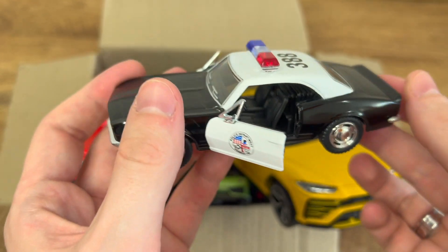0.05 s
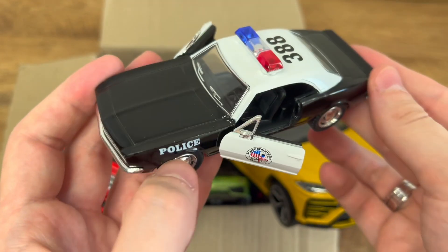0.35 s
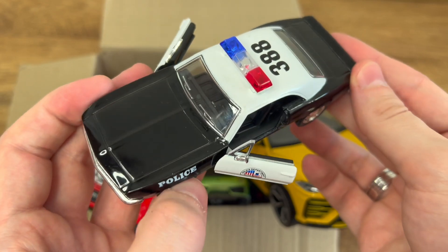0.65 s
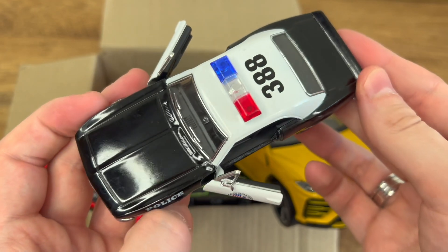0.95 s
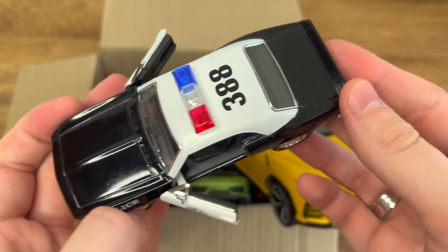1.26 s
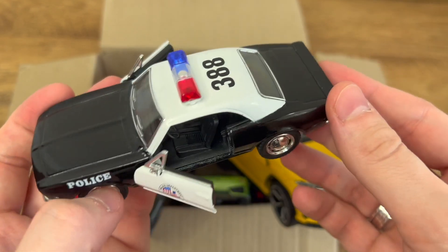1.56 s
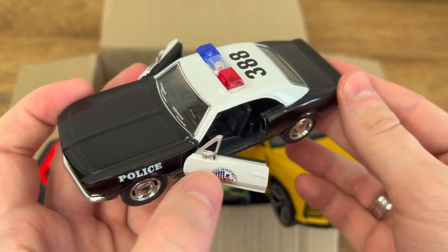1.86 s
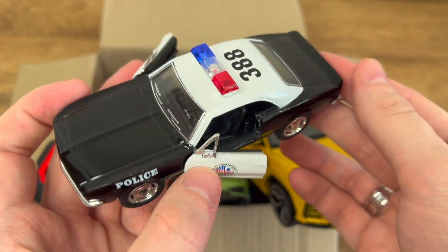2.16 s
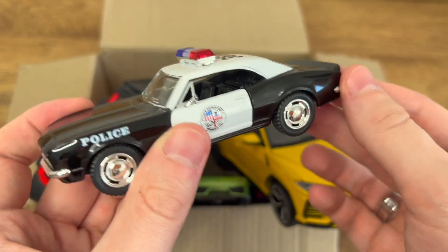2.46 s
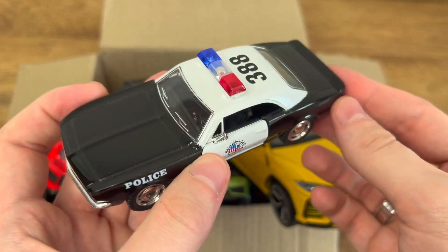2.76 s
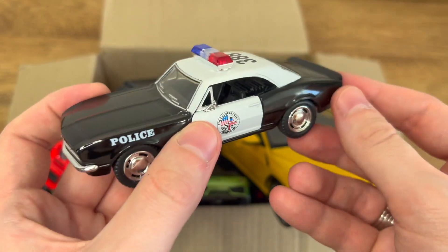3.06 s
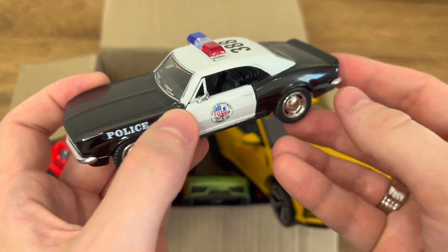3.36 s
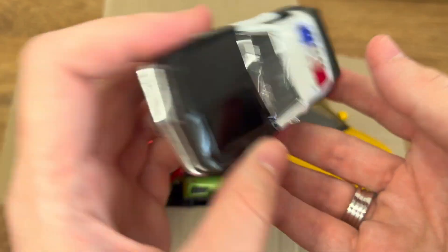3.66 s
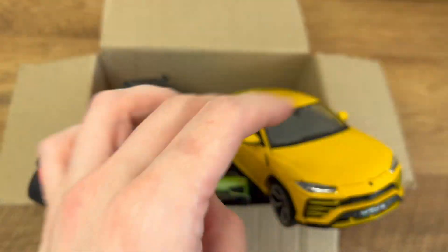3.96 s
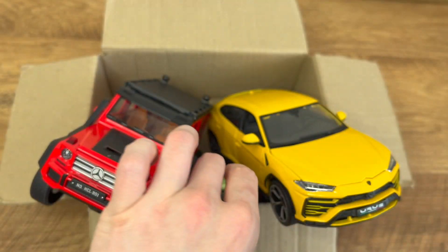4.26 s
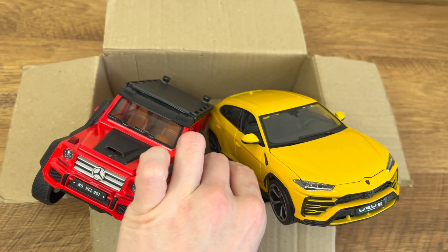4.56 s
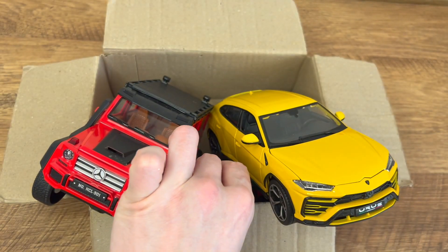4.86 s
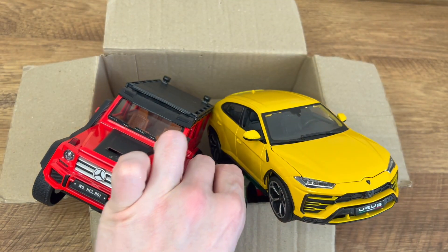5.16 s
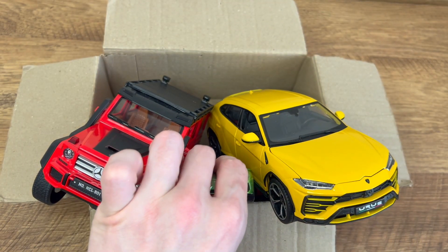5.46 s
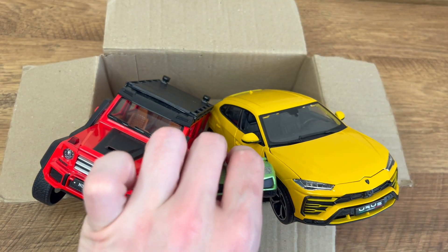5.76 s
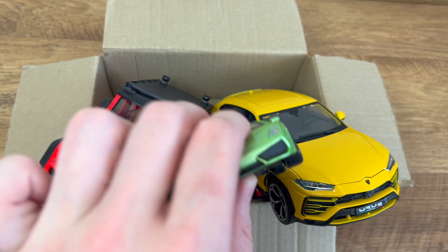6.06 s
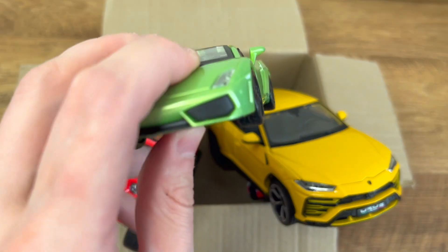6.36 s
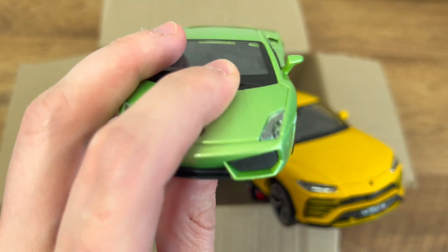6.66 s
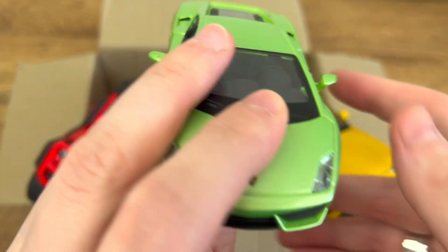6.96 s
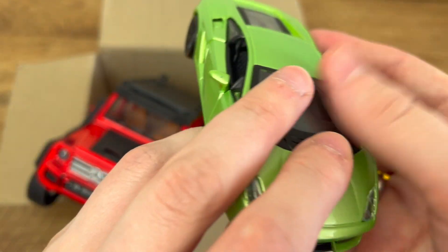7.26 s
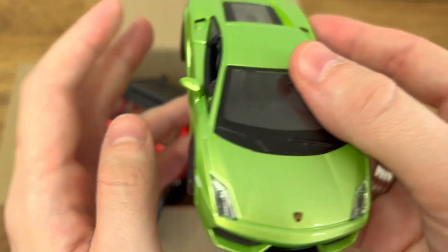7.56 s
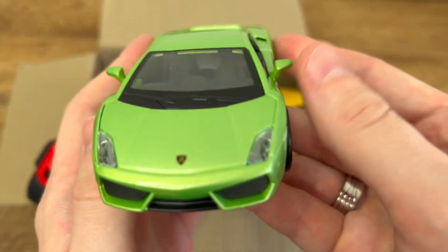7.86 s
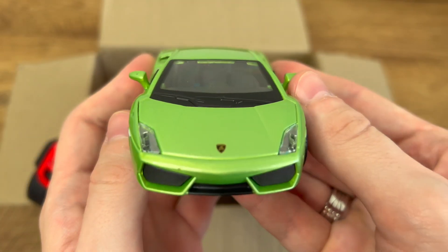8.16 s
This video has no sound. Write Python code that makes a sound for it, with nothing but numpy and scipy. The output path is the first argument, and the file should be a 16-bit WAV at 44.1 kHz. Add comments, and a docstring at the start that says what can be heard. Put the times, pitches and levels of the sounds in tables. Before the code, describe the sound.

Toy cars click and rattle in the hands, then one is dragged from a rasping cardboard box, knocking against the others.

```python
"""Die-cast toy cars are handled over a cardboard box, close to a stereo microphone in a small room.
First a police car ticks in the fingers as loose wheels and doors strike its ringing shell. Its door
snaps shut at 2.2 s; near 3.8 s its gears run up and it rattles as it is put aside. From 4.4 s a sports
car is dragged out, bumping its neighbours, while stick-slip friction makes the cardboard rasp, groan
and crackle. From 6.2 s the sports car clacks as it is turned over and its axles shift in their slots."""
import sys
import numpy as np
from scipy import signal
from scipy.fft import rfft, irfft
from scipy.io import wavfile
from scipy.ndimage import map_coordinates

SR = 44100
rng = np.random.default_rng(int(sys.argv[2]) if len(sys.argv) > 2 else 0)


def store_wav(level_fs):
    """Save 16-bit WAV to argv[1]."""
    pcm = np.round(np.clip(np.atleast_2d(level_fs), -1, 1) * 32767)
    wavfile.write(sys.argv[1], SR, pcm.T.astype(np.int16))


N = 366471
TIME = np.arange(N) / SR


def impacts(contacts, modes, width_hz, dense_modes, ring_db, crack_t60, treble_t60, rise_s,
            chatter_t60, spread, gain_db, focus_db=10.5, focus_octaves=0.34, softening=0.29):
    """Modal superposition: each blow excites damped modes over a crack of dense, short-lived ones."""
    track, t = np.zeros((2, N)), TIME[:5120]
    mode_hz, mode_db = np.transpose(modes)
    for start_s, level_db, treble_db, focus_hz in contacts:
        # the grip detunes the modes, the contact point weights them, soft blows favour the low ones
        detuned_hz = mode_hz * (1 + 0.013 * rng.standard_normal(len(modes)))
        boost_db = focus_db * np.exp(-(np.log2(mode_hz / focus_hz) / focus_octaves) ** 2)
        tilt_db = softening * (treble_db + 4) * np.log2(mode_hz / mode_hz[0])
        amplitudes = undb(mode_db + tilt_db + boost_db + 2.2 * rng.standard_normal(len(modes)))
        phases = 2 * np.pi * rng.random(len(modes)) + spread * rng.standard_normal((2, len(modes)))
        oscillations = np.exp(np.pi * (2j * detuned_hz - width_hz)[:, None] * t)
        ring = unit(((amplitudes * np.exp(1j * phases)) @ oscillations).imag)
        crack = colour(stereo_noise(len(t), spread) * fade(t, crack_t60), dense_modes)
        crack = unit(butter(crack, 4300, "low"))
        tick = colour(stereo_noise(len(t), spread / 2) * fade(t, treble_t60), dense_modes)
        tick = unit(butter(tick, 4280, "high"))
        # hard contacts crack; soft ones push for longer, so the shell rings up more slowly
        hardness = undb(softening * treble_db)
        rise = 1 - np.exp(-t * hardness / rise_s)
        body = unit(hardness * crack + undb(ring_db) * ring)
        blow = (body + undb(treble_db) * tick) * rise * undb(gain_db + level_db)
        add(track, start_s, signal.fftconvolve(blow, rebounds(chatter_t60)))
    return track


def rebounds(t60, level_db=-9, per_s=2000, size=2048):
    """Contact chatter: one impulse and its dying rebounds, scaled to unit energy."""
    taps = rng.standard_normal(size) * (rng.random(size) < per_s / SR)
    taps *= undb(level_db) * fade(TIME[:size], t60)
    taps[0] = 1
    return taps[None] / np.linalg.norm(taps)


def wheel_jiggles(spans, per_s=55, scatter_db=3, treble_db=-31, focus_hz=2200):
    """Mechanical play: loose wheels make soft contacts at random moments."""
    return [(start_s + length_s * rng.random(), level_db + scatter_db * rng.standard_normal(),
             treble_db, focus_hz)
            for start_s, length_s, level_db in spans for _ in range(int(per_s * length_s))]


def gear_teeth(start_s=3.755, run_s=0.097, teeth_hz=165, end_db=-19, swell_db_per_s=79.5,
               treble_db=-15, focus_hz=1600):
    """Gear meshing: as the wheels are brushed, teeth strike unevenly, ever harder, then stop dead."""
    times = np.arange(0, run_s, 1 / teeth_hz)
    scatter = rng.standard_normal((len(times), 2))
    return [(start_s + t + 0.29 * lag / teeth_hz, end_db - swell_db_per_s * (run_s - t) + scatter_db,
             treble_db, focus_hz) for t, (lag, scatter_db) in zip(times, scatter)]


# Levels in all tables are relative; focus_hz is the region of modes that a contact favours.
# loose wheels and doors strike the shell: start_s, level_db, treble_db, focus_hz
POLICE_CONTACTS = [(0.167, -33.5, -21, 2310), (0.1915, -19, -12.5, 2330), (0.2017, -24.5, -17, 2170),
                   (0.2887, -23, -5, 2560), (0.3095, -26.5, -27.5, 2710), (0.5029, -31, -24, 2360),
                   (0.7089, -39, -19.5, 2920), (1.4141, -27, -14.5, 2860), (1.5539, -18.5, -7, 2540),
                   (1.6573, -24.5, -9, 2460), (1.7195, -31.5, -25.5, 2550), (2.185, -25.5, -10, 1980),
                   (2.1935, -24.5, -1, 2350), (2.4081, -32, -11.5, 2320), (2.5999, -28.5, -23, 2390),
                   (2.6117, -17.5, -6.5, 2030), (2.8255, -43.5, -16, 1676), (2.9307, -35.5, -19, 2360),
                   (2.9939, -25.5, -6.5, 3430), (3.018, -29, -7, 2470), (3.119, -45.5, -21, 1900),
                   (3.2881, -30, -11, 2383), (3.312, -20.5, -12.5, 2040), (3.4575, -38, -16.5, 2020),
                   (3.5962, -27, -17.5, 2710), (3.6725, -33.5, -18, 2420), (3.6853, -29, -16.5, 1650),
                   (3.7468, -16, -5.5, 1940), (3.7699, -36, -14.5, 1980), (3.7993, -26.5, -13.5, 1880),
                   (3.8187, -18, -6.5, 1870), (3.8552, -15, -16, 1655), (3.8876, -39.5, -52, 2210),
                   (3.9409, -48, -45, 1540), (4.1711, -45, -35, 1546)]
# the wheels jiggle as the grip shifts: start_s, length_s, level_db
POLICE_JIGGLES = [(1.965, .04, -49.5), (3.434, 0.05, -44), (3.648, 0.077, -38)]
# resonances of the shell: frequency_hz, level_db
POLICE_MODES = [(580, -15.5), (1160, -4), (1540, -2), (1696, 1.5), (1870, 0.5), (2034, -4.5), (2317, 2),
                (2574, -3), (2940, 2), (3882, -10), (4570, -10.5), (5196, -15)]
# spectrum of its dense, short-lived modes: frequency_hz, level_db
POLICE_DENSE_MODES = [(100, -34.5), (400, -31), (650, -19), (1200, -17.5), (1900, -4), (2900, -4),
                      (3600, -10.5), (6500, -10.5), (10000, -21.5), (14500, -19.5)]
# the car moves from the left to the middle: time_s, left_minus_right_db
POLICE_PAN = [(0, 3.5), (3.6, 4), (3.8, -0.5)]
POLICE_WIDTH_HZ = 115  # bandwidth of each mode, damped by the hand


def police_car():
    """Impact excitation: loose parts ring the metal shell; a level difference sets its direction."""
    contacts = POLICE_CONTACTS + gear_teeth() + wheel_jiggles(POLICE_JIGGLES)
    shell = impacts(contacts, POLICE_MODES, POLICE_WIDTH_HZ, POLICE_DENSE_MODES, ring_db=-2,
                    crack_t60=0.062, treble_t60=0.045, rise_s=0.00046, chatter_t60=0.017,
                    spread=0.76, gain_db=-17.5)
    return shell * undb(np.array([[0.5], [-0.5]]) * curve(POLICE_PAN))


# the door touches its catch, jumps it, then seats: start_s, level_db, treble_db, focus_hz
LATCH_CONTACTS = [(2.1737, -38.5, 9, 3630), (2.2103, -18.5, 10, 5000), (2.2137, -17, 8.5, 3100)]
# spectrum of the snap's dense modes: frequency_hz, level_db
LATCH_DENSE_MODES = [(400, -19), (3300, 3.5), (10000, -3), (14000, 1)]


def door_latch():
    """Stiff contact: the small latch excites only the upper modes of the police car's shell."""
    upper_modes = [(hz, db) for hz, db in POLICE_MODES if hz > 2750]
    return impacts(LATCH_CONTACTS, upper_modes, POLICE_WIDTH_HZ, LATCH_DENSE_MODES, ring_db=-5,
                   crack_t60=0.084, treble_t60=0.0099, rise_s=0.0012, chatter_t60=0.0045,
                   spread=0.61, gain_db=-14)


def door(squeak_s=0.0081, squeak_hz=6300, squeak_db=-16, jolt_hz=72, jolt_t60=0.053, jolt_db=-37):
    """Friction and recoil: the tight door squeaks into its frame, then the snap jolts the hands."""
    track, t = np.zeros((2, N)), TIME[:SR // 2]
    jump_s, seat_s = LATCH_CONTACTS[1][0], LATCH_CONTACTS[2][0]
    squeak = unit(signal.lfilter(*signal.iirpeak(squeak_hz, Q=5, fs=SR), stereo_noise(len(t), 0.21)))
    add(track, jump_s - squeak_s, undb(squeak_db) * squeak * (t / squeak_s) * (t < squeak_s))
    thud = unit(butter(stereo_noise(len(t), 0.42), 370, "low", order=2))
    jolt = np.sin(2 * np.pi * jolt_hz * t) + 0.5 * thud
    add(track, seat_s, undb(jolt_db) * jolt * fade(t, jolt_t60))
    return track


# the axles shift in their slots: start_s, level_db, treble_db, focus_hz
SPORTS_CONTACTS = [(6.1718, -26, -24, 2400), (6.4441, -34, -16.5, 2330), (7.0723, -22, -14, 1149),
                   (7.085, -24, -21, 1880), (7.1835, -17.5, -24.5, 1860), (7.2726, -40.5, -9, 1850),
                   (7.3529, -23, -21, 2300), (7.3666, -24.5, -17, 2342), (7.6416, -28, -4.5, 2004),
                   (7.6458, -13, -11, 2093)]
# the wheels jiggle against the fingers: start_s, length_s, level_db
SPORTS_JIGGLES = [(7.11, .025, -35.5), (7.372, 0.055, -35.5), (8.0, .04, -50.5)]
# resonances of the shell: frequency_hz, level_db
SPORTS_MODES = [(1020, -8.5), (1200, -5.5), (1600, -1), (1860, 4.5), (2080, 2.5), (2410, 6.5), (3100, -3)]
# spectrum of its dense, short-lived modes: frequency_hz, level_db
SPORTS_DENSE_MODES = [(200, -36.5), (450, -15.5), (750, -22), (1000, -6), (2200, -3), (3300, -12.5),
                      (5500, -9.5), (10000, -19), (14000, -16.5)]


def sports_car(width_hz=170):
    """Damping: the hand broadens the shell's modes, so each blow of an axle is a short clack."""
    contacts = SPORTS_CONTACTS + wheel_jiggles(SPORTS_JIGGLES)
    return impacts(contacts, SPORTS_MODES, width_hz, SPORTS_DENSE_MODES, ring_db=3,
                   crack_t60=0.061, treble_t60=0.035, rise_s=0.00091, chatter_t60=0.0098,
                   spread=0.72, gain_db=-14)


# the cars bump each other in the box: start_s, level_db, treble_db, focus_hz
BOX_CONTACTS = [(4.4148, -31.5, -4, 2770), (4.4958, -24, -14.5, 1370), (4.5195, -23.5, -26, 1364),
                (4.573, -24.5, -13.5, 1060), (4.772, -33, -12, 1400), (4.828, -21, -13.5, 2030),
                (4.969, -29, -14.5, 1020), (5.1704, -19.5, -11.5, 1090), (5.1897, -18, -6.5, 1100),
                (5.235, -17.5, -5.5, 1110), (5.2614, -24.5, -7, 1160), (5.341, -25, -29, 1170),
                (5.436, -22, -10, 1090), (5.5069, -22, -17.5, 1010), (5.6158, -22, -15.5, 1840),
                (5.6474, -19.5, -6, 1260), (5.656, -18.5, -6.5, 1190), (5.692, -21, -8.5, 1180),
                (5.7878, -21, -10, 1090), (5.8336, -20.5, -6, 1160)]
# resonances of the cars in the box: frequency_hz, level_db
BOX_MODES = [(1081.4, -3.5), (1300, -3.5), (1510, -8.5), (1914, -3.5), (2278, -8), (2515, -1), (2964, -2)]
# spectrum of the filled box's dense, short-lived modes: frequency_hz, level_db
BOX_DENSE_MODES = [(100, -22.5), (300, -4.5), (750, -5), (1100, 4.5), (2200, -1.5), (5000, -12),
                   (12000, -22.5), (16000, -24.5)]
BOX_WIDTH_HZ = 70  # bandwidth of each mode


def cars_in_box():
    """Collision and rebound: the lightly damped cars knock together and chatter."""
    return impacts(BOX_CONTACTS, BOX_MODES, BOX_WIDTH_HZ, BOX_DENSE_MODES, ring_db=-4.5,
                   crack_t60=0.044, treble_t60=0.021, rise_s=0.0011, chatter_t60=0.069,
                   spread=0.62, gain_db=-14.5)


# the hand tugs the sports car over the cardboard: start_s, length_s, flex_db, rasp_db
TUGS = [(4.452, 0.17, -57, -42.5), (4.803, 0.36, -43, -49), (5.193, 0.086, -39.5, -45),
        (5.365, 0.025, -42.5, -60.5), (5.6, .24, -48, -45), (5.875, 0.036, -48, -37.5),
        (6.072, 0.047, -64, -45.5)]


def tug_envelopes(attack_s=0.0087, release_t60=0.28):
    """Driving force: each tug builds, holds and decays, giving envelopes for flexing and rasping."""
    flexing, rasping = np.zeros((2, N))
    for start_s, length_s, flex_db, rasp_db in TUGS:
        t = TIME - start_s
        force = np.clip(t / attack_s, 0, 1) * fade(np.maximum(t - length_s, 0), release_t60)
        flexing += undb(flex_db) * force
        rasping += undb(rasp_db) * force
    return flexing, rasping


# resonances of the box's panels: frequency_hz, level_db
PANEL_MODES = [(81.3, 1.5), (236.6, 4.5), (322.2, 8), (442.5, 0.5), (605, 2.5), (899, -4.5)]
# spectrum of edges rasping on paper: frequency_hz, level_db
RASP_SPECTRUM = [(300, -13.5), (1100, -10.5), (2300, -1), (3300, -8), (9500, -21), (16000, -30.5)]


def drag(flex_db=2, shudder_db=-14, rasp_db=-3, scrape_db=-11):
    """Sliding friction: juddering tyres shake the panels; edges rasp on paper and scrape other cars."""
    judder = slips(per_s=500, scatter_db=6, spread=0.3)
    flex = rubbed(judder, PANEL_MODES, width_hz=20.5, drift=0.053)
    flex = unit(butter(flex, 1750, "low") * undb(1.26 * wobble(N, 21)))
    shudder = unit(butter(judder, [60, 130], "band", order=3))
    grit = slips(per_s=16000, scatter_db=1.2, spread=0.5) * undb(4.5 * wobble(N, 45))
    rasp = unit(colour(grit, RASP_SPECTRUM))
    scrape = rubbed(grit, BOX_MODES, BOX_WIDTH_HZ, drift=0.055)
    panels = undb(flex_db) * flex + undb(shudder_db) * shudder
    edges = undb(rasp_db) * rasp + undb(scrape_db) * scrape
    flexing, rasping = tug_envelopes()
    return panels * flexing + edges * rasping


def slips(per_s, scatter_db, spread):
    """Stick-slip: impulses of uneven size at random moments."""
    slipping = rng.random(N) < per_s / SR
    return stereo_noise(N, spread) * slipping * undb(scatter_db * rng.standard_normal(N))


def rubbed(force, modes, width_hz, drift, drift_hz=9):
    """Forced vibration: a moving contact drives modes whose pitch wanders as the load shifts."""
    ring = sum(undb(db) * butter(force, [hz - width_hz / 2, hz + width_hz / 2], "band", order=1)
               for hz, db in modes)
    read_position = np.cumsum(1 + drift * wobble(N, drift_hz))
    return unit(np.array([map_coordinates(channel, [read_position], mode="mirror") for channel in ring]))


# the cardboard gives way: start_s, level_db, pitch_hz
BUCKLES = [(4.577, -25, 266.4), (4.578, -26.5, 624), (4.822, -32, 257), (4.909, -30.5, 625),
           (4.966, -24.5, 336), (5.004, -32.5, 452), (5.101, -32, 311), (5.216, -29, 328),
           (5.289, -29.5, 382), (5.508, -30.5, 485), (6.097, -36, 571)]


def groans(rise_s=0.0017, t60=0.089, waver=0.054, octave_db=-10, knock_db=-4, knock_t60=0.041):
    """Buckling: a panel gives a hollow knock and a short, unsteady low note with its octave."""
    track, t = np.zeros((2, N)), TIME[:SR // 5]
    rise = 1 - np.exp(-t / rise_s)
    for start_s, level_db, pitch_hz in BUCKLES:
        wavering_hz = pitch_hz * (1 + waver * wobble(len(t), 105))
        phase = 2 * np.pi * np.cumsum(wavering_hz) / SR + 0.5 * rng.standard_normal((2, 1))
        note = (np.sin(phase) + undb(octave_db) * np.sin(2 * phase)) * fade(t, t60)
        hollow = butter(stereo_noise(len(t), 0.77), [pitch_hz / 2, pitch_hz * 2], "band", order=3)
        knock = undb(knock_db) * unit(hollow) * fade(t, knock_t60)
        add(track, start_s, (note + knock) * rise * undb(level_db))
    return track


def crackle(level_db=-8, grain_t60=0.019):
    """Acoustic emission: paper fibres and flutes give way one by one while the box is bent."""
    snaps = np.abs(slips(per_s=300, scatter_db=3.2, spread=0.5))
    bursts = signal.fftconvolve(snaps, fade(TIME[:SR // 20], grain_t60)[None])[:, :N]
    grains = unit(colour(bursts * stereo_noise(N, 0.45), BOX_DENSE_MODES))
    flexing, _ = tug_envelopes()
    return undb(level_db) * grains * flexing


# skin slides over the paint: centre_s, length_s, level_db
FINGER_SLIDES = [(6.307, 0.053, -62), (7.329, 0.033, -38)]
# spectrum of the sliding skin: frequency_hz, level_db
SKIN_SPECTRUM = [(400, -9), (2300, 0), (5000, -13.5), (7600, 4.5), (10000, -16), (14000, -7.5)]


def fingers():
    """Friction noise: short swells of hiss as the grip shifts."""
    swell = sum(undb(level_db) * np.exp(-(2 * (TIME - centre_s) / length_s) ** 2)
                for centre_s, length_s, level_db in FINGER_SLIDES)
    return swell * unit(colour(stereo_noise(N, 0.44), SKIN_SPECTRUM))


# bumps of the hands and the box: start_s, level_db
SOFT_BUMPS = [(1.339, -44), (4.574, -44)]


def bumps(band_hz=(50, 110), rise_s=0.01, t60=0.38):
    """Compliant contact: flesh and cardboard yield slowly and give only a dull, deep thud."""
    track, t = np.zeros((2, N)), TIME[:SR // 2]
    envelope = (1 - np.exp(-t / rise_s)) * fade(t, t60)
    for start_s, level_db in SOFT_BUMPS:
        thud = unit(butter(stereo_noise(len(t), 0.2), band_hz, "band", order=2))
        add(track, start_s, thud * envelope * undb(level_db))
    return track


def room(direct, wet_db=-11, low_t60=0.43, mid_t60=0.32, top_t60=0.35, build_s=0.0087):
    """Reverberation: a small bare room's diffuse tail builds quickly and lasts longest in the bass."""
    t, tail = TIME[:SR * 3 // 4], 0
    bands = ([200, 1200], low_t60, -4), ([1200, 7000], mid_t60, 0), ([7000, 17000], top_t60, -4)
    for band_hz, t60, level_db in bands:
        diffuse = butter(stereo_noise(len(t), 0.15), band_hz, "band", order=2)
        tail += undb(level_db) * diffuse * fade(t, t60)
    tail *= 1 - np.exp(-(t / build_s) ** 2)
    tail *= np.sqrt(2 * np.log(1000) / (mid_t60 * SR))  # normalises by the mid decay's energy
    return direct + undb(wet_db) * signal.fftconvolve(direct, tail, axes=1)[:, :N]


# spectrum of the faint hiss, with a dip near 10 kHz from the microphone or coder: frequency_hz, level_db
HISS_SPECTRUM = [(200, -7), (400, -10.5), (1000, -22.5), (2000, -20.5), (3500, -28.5), (7500, -30),
                 (10000, -45.5), (13000, -27), (16000, -56)]
# spectrum of the low background rumble: frequency_hz, level_db
RUMBLE_SPECTRUM = [(50, -0.5), (75, 2), (100, -8.5), (160, -13.5), (900, -53)]
# preset curve for the rumble, imitating a recorder's gain dip after the snap: time_s, level_db
RUMBLE_GAIN = [(0, -59.5), (1.3, -55.5), (2.3, -63.5), (2.75, -72.5), (4.3, -63.5), (5.2, -54.5),
               (8.3, -60.5)]


def background(hiss_db=-67):
    """Noise floor: faint hiss over a low rumble that sinks after the door snap and slowly returns."""
    rumble = unit(colour(stereo_noise(N, 0.082), RUMBLE_SPECTRUM)) * undb(curve(RUMBLE_GAIN))
    hiss = unit(colour(stereo_noise(N, 0.68), HISS_SPECTRUM)) * undb(hiss_db)
    return butter(rumble + hiss, 48, "high")


def undb(db):
    """Decibels to amplitude ratio."""
    return 10 ** (np.asarray(db) / 20)


def unit(x):
    """Normalisation to rms 1."""
    return x / np.sqrt(np.mean(x ** 2))


def fade(t, t60):
    """Exponential decay, 60 dB down after t60 seconds."""
    return np.exp(-np.log(1000) * t / t60)


def curve(points):
    """Linear interpolation of (time_s, value) points."""
    return np.interp(TIME, *np.transpose(points))


def add(track, start_s, sound):
    """Superposition of a sound on the track."""
    start = int(start_s * SR)
    track[:, start:start + sound.shape[-1]] += sound[..., :N - start]


def butter(x, hz, kind, order=4):
    """Butterworth filter."""
    return signal.sosfilt(signal.butter(order, hz, kind, fs=SR, output="sos"), x)


def colour(x, spectrum, size=4096):
    """Minimum-phase filter through (frequency_hz, level_db) points."""
    hz, db = np.transpose(spectrum)
    bin_hz = np.arange(size // 2 + 1) * SR / size
    gain = undb(np.interp(np.log(bin_hz + 1), np.log(hz), db))
    cepstrum = irfft(np.log(gain))[:size // 2]
    cepstrum[1:] *= 2
    response = irfft(np.exp(rfft(cepstrum, size)))
    return signal.fftconvolve(x, response[None])[:, :x.shape[-1]]


def stereo_noise(size, spread):
    """Partly correlated white noise; spread is the ratio of side to middle."""
    mid, side = rng.standard_normal((2, size))
    return np.array([mid + spread * side, mid - spread * side]) / np.hypot(1, spread)


def wobble(size, hz):
    """Random modulation: noise low-passed at hz, with rms 1."""
    return unit(butter(rng.standard_normal(size), hz, "low", order=2))


def scene():
    """Superposition: cars, cardboard and fingers sound in one room, over thuds and the noise floor."""
    cars = police_car() + door_latch() + door() + cars_in_box() + sports_car()
    cardboard = groans() + drag() + crackle()
    return room(cars + cardboard + fingers()) + bumps() + background()


def record(dry, port_hz=9400, port_q=3, top_hz=16000):
    """Port resonance turns the phase of the right microphone's treble; the recorder cuts the top."""
    left, right = dry
    all_passed = 2 * signal.lfilter(*signal.iirnotch(port_hz, port_q, fs=SR), right) - right
    low_pass = signal.ellip(10, 0.2, 90, top_hz, fs=SR, output="sos")
    return signal.sosfilt(low_pass, [left, all_passed])


dry = scene()
out = record(dry)
store_wav(out)
```